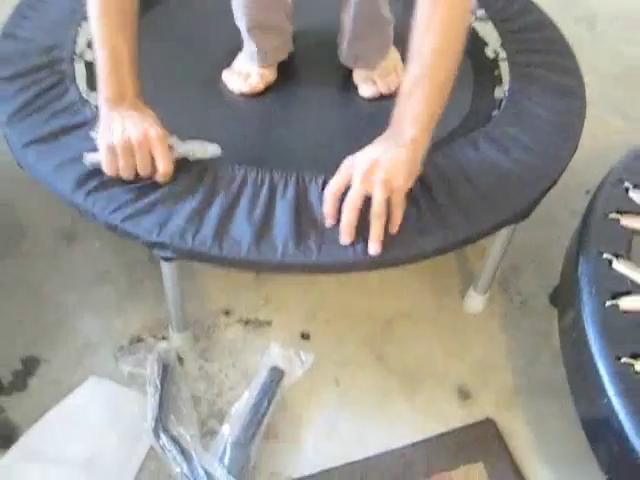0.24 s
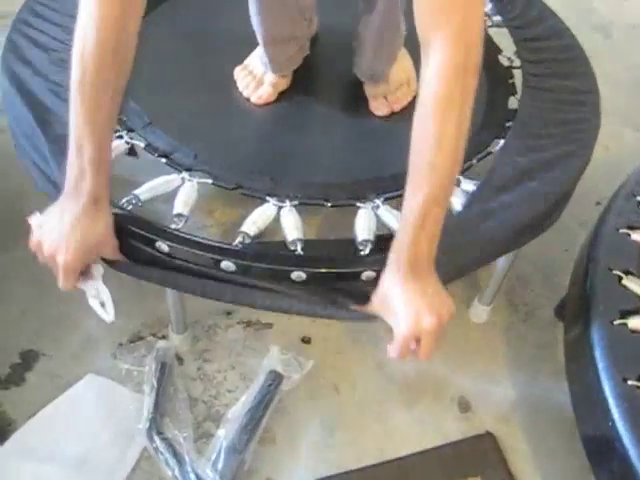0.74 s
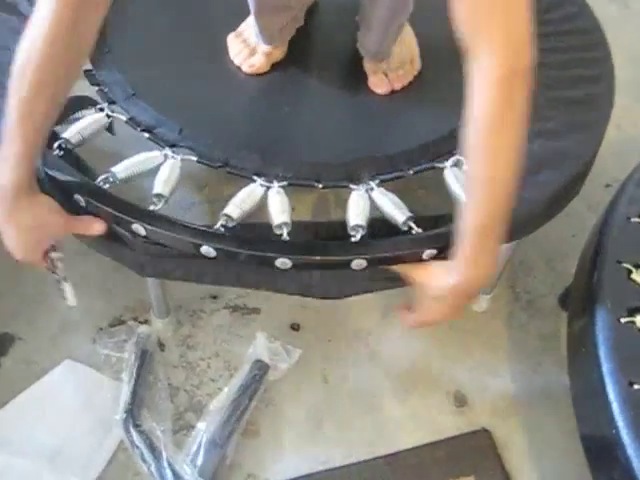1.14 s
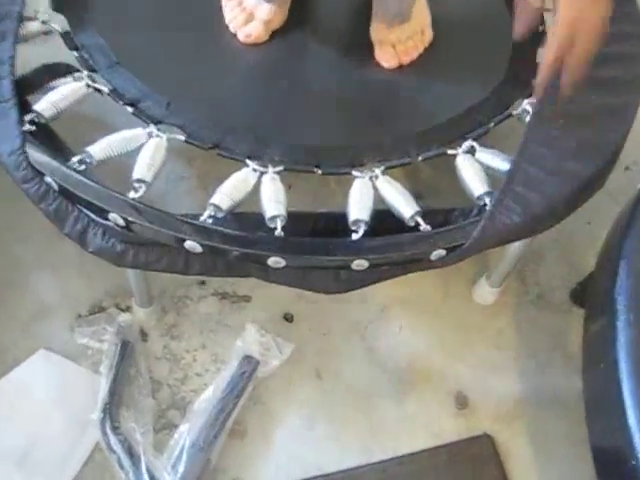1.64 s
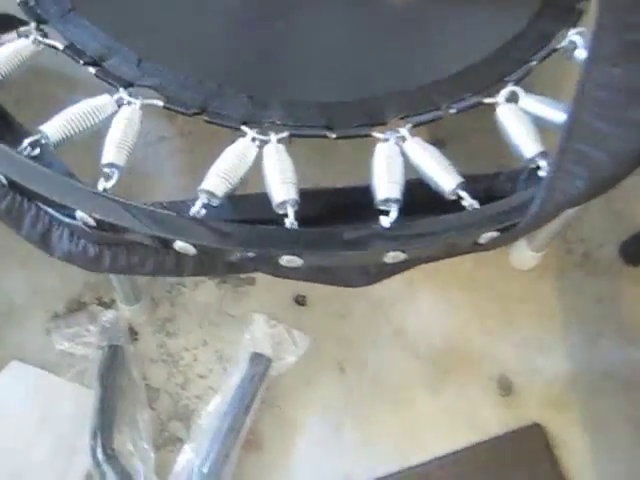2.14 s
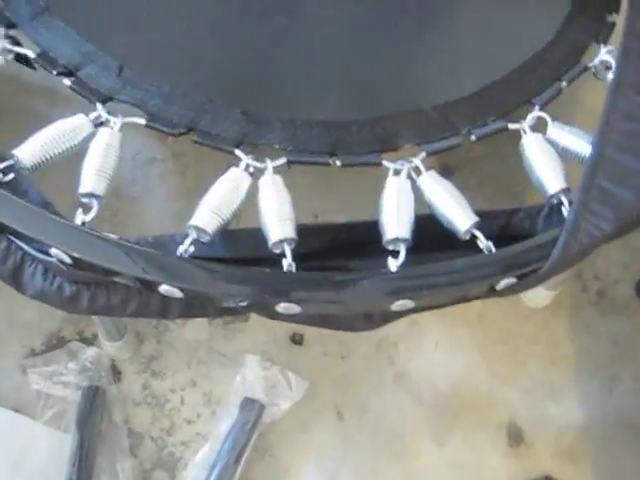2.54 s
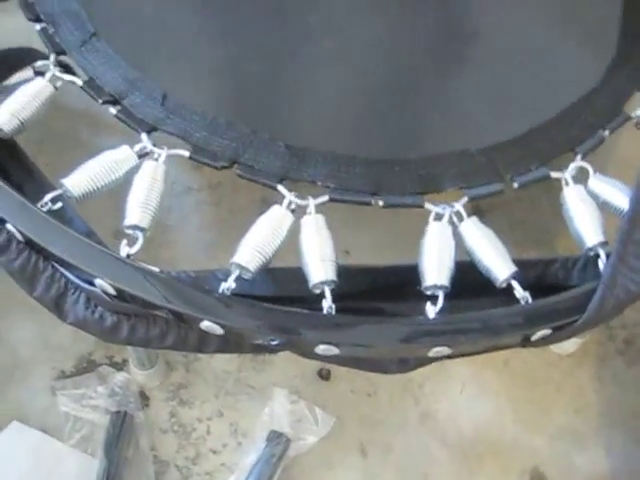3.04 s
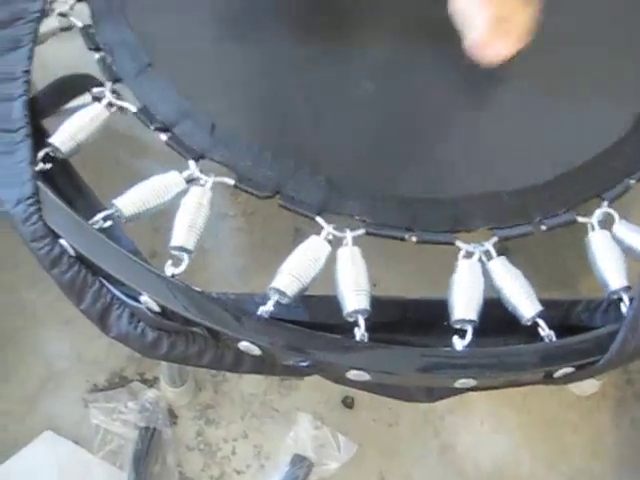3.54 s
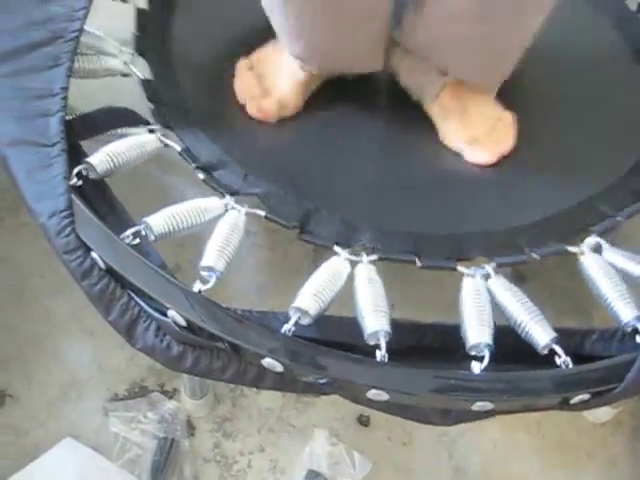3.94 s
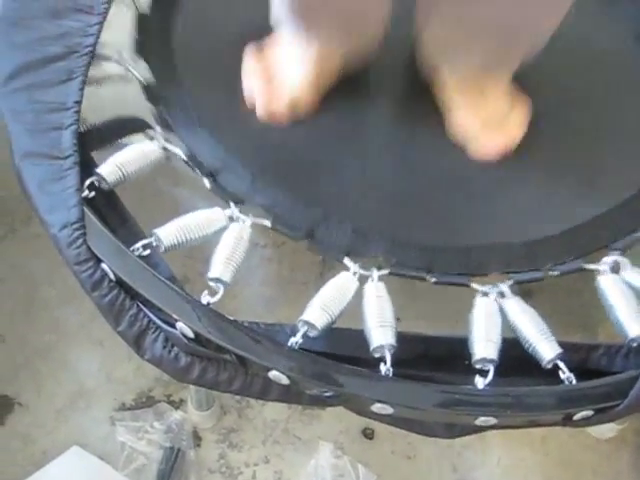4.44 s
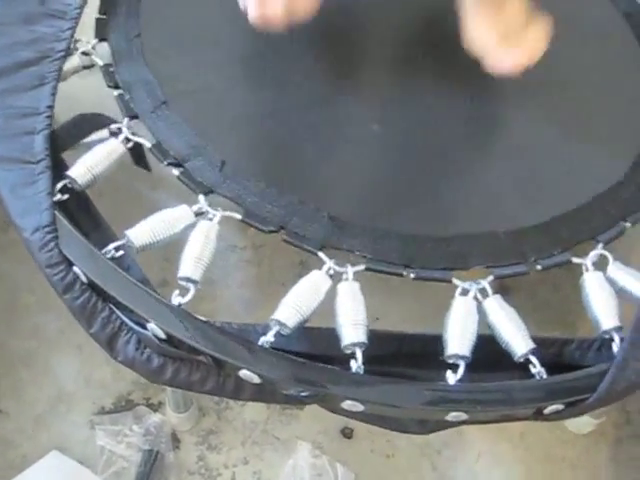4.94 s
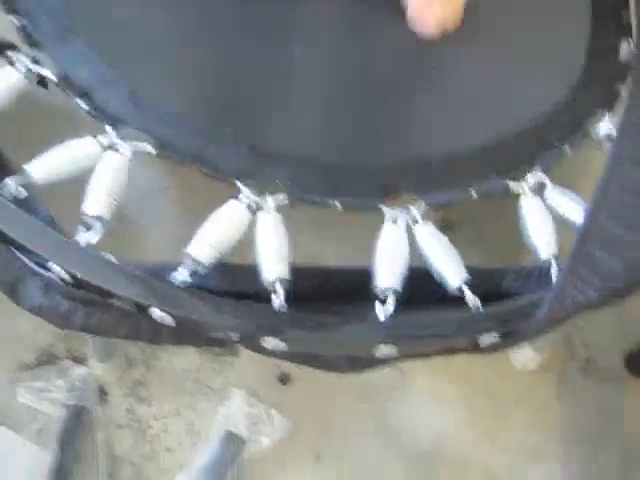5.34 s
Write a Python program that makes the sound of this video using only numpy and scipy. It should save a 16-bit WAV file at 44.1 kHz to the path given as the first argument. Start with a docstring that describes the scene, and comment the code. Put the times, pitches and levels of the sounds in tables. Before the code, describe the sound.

A fabric cover rustles and knocks off a mini-trampoline's rim, then steel springs creak and clink over soft barefoot bounces in a garage.

```python
"""A mini-trampoline creaks and thuds in a garage as someone bounces on it barefoot. Each landing thumps
the mat, and the steel spring hooks grind, crack and ring as they take the load.
Before the bouncing, a padded fabric cover is pulled off the rim: the cloth rustles and snaps taut, and
its hem knocks on the rim and drags over the coils, which shimmer.
The concrete echoes it all, over a soft hiss and a faint hum."""
import sys
import numpy as np
from scipy import signal
from scipy.fft import rfft, irfft, next_fast_len
from scipy.io import wavfile

SR = 44100
rng = np.random.default_rng(int(sys.argv[2]) if len(sys.argv) > 2 else 0)


def log_audio(samples):
    """Write samples as a 16-bit WAV file to the path given in sys.argv[1]."""
    # one column per channel
    frames = np.atleast_2d(samples).T
    # limit to full scale, then quantise
    limited = np.clip(frames, -1, 1)
    pcm = np.round(limited * 32767).astype(np.int16)
    wavfile.write(sys.argv[1], SR, pcm)


N = 247204
TIME = np.arange(N) / SR

# Levels in the tables are relative: the functions add gains of their own.
# A fade is the time to fall to about a third; a ring time is the time to fall by 60 dB.

# Barefoot landings. Each row: when the toes touch and how much later the heels do, in seconds, thud in
# dB, heel press in seconds, then in dB the heel rub, the creak going down and the creak going up.
LANDINGS = [(3.199, 0.082, -23.5, 0.11, -34, -31, -26), (3.804, 0.11, -23.5, 0.17, -28, -27.5, -26),
            (4.415, 0.115, -20.5, 0.083, -28.5, -30.5, -29), (5.016, 0.115, -21.5, 0.068, -28.5, -32, -31)]
# The feet leave the mat and the slack springs rattle. Each row: time in seconds, level in dB.
LIFTOFFS = [(2.935, -25.5), (3.57, -24.5), (4.145, -25), (4.77, -30.5), (5.375, -34.5)]
# The jumper first shifts weight. In order: start and length in seconds, hook creak and mat rub in dB.
WEIGHT_SHIFT = (2.15, 0.72, -41.5, -43)
# The first push out of the mat. In order: time in seconds, thud and mat rub in dB.
FIRST_PUSH = (2.937, -32, -29.5)
# The parts of a bounce. Each holds delay, rise time and length in seconds, then fall in dB per second.
STRETCH = (0.02, 0.025, 0.125, 140)   # hooks turn as the mat sinks
RECOIL = (0.2, 0.029, 0.06, 96)   # hooks turn back as it rises
BEARING = (0.005, 0.06, 0.39, 85)   # the mat carries the weight
PUSH_RUB = (-0.012, 0.015, 0.02, 100)   # the mat rubs at the first push

# Hooks slip with a crack. Each row: start and fade in seconds, level in dB, pitch in Hz, drop away from
# that pitch in dB per octave, coil ring in dB.
HOOK_CRACKS = [(2.308, 0.005, -42, 5000, 3, -70), (2.438, 0.004, -40, 3640, 6, -68),
               (2.556, 0.003, -35, 3060, 10, -63), (2.7145, 0.0032, -27.5, 11500, 18, -73),
               (2.827, 0.0038, -28.5, 2630, 9, -70), (2.852, 0.015, -36.5, 3470, 2, -56),
               (3.2833, 0.002, -10.5, 3570, 5, -48), (3.3489, 0.0036, -13.5, 6120, 3, -38),
               (3.4513, 0.0025, -16.5, 6860, 3.5, -40), (3.4937, 0.0038, -11.5, 5500, 6, -57),
               (3.832, 0.005, -26.5, 3840, 14, -60), (3.853, 0.0033, -18.5, 4780, 14, -57),
               (3.87, 0.0052, -21.5, 5750, 14, -60), (3.918, 0.0034, -19, 6920, 1, -47),
               (3.9471, 0.0035, -16, 7300, 3.5, -55), (4.048, 0.0065, -21.5, 6050, 4, -53),
               (4.063, 0.0031, -21.5, 7030, 10, -46), (4.071, 0.0061, -17.5, 7360, 6, -63),
               (4.0922, 0.0023, -18, 7260, 20, -39.5), (4.45, 0.005, -19.5, 5600, 13, -61),
               (4.4633, 0.002, -10.5, 4800, 15, -42), (4.691, 0.002, -14.5, 6000, 3.5, -31.5),
               (4.767, 0.0036, -21.5, 6400, 4, -55), (5.08, 0.003, -29.5, 4000, 2.5, -52),
               (5.3504, 0.0026, -15.5, 6700, 3.5, -40.5)]
# Dry hooks squeak. Each row: start and length in seconds, final pitch in Hz, level in dB, and the octave
# above in dB compared with that level.
HOOK_SQUEAKS = [(2.393, 0.015, 3850, -32, -16), (2.503, 0.0092, 3850, -23.5, -13),
                (2.512, 0.044, 3345, -32, 0), (4.438, 0.014, 3010, -27, -3), (5.039, 0.0076, 3050, -25, -7),
                (5.047, 0.023, 2540, -27, -2), (5.331, 0.02, 2420, -25, -19)]
# The noise bands that make up a knock or crack. Each row: low edge and high edge in Hz.
CONTACT_BANDS = [(700, 2200), (2200, 5500), (5500, 9000), (9000, 14500)]

# Hands pull the cover. Each row: start, rise time and length in seconds, fall in dB per second, then
# rustle, crisp treble and padding rub in dB.
COVER_PULLS = [(-0.04, 0.03, 0.24, 90, -39, -45, -44), (0.235, 0.064, 0.12, 82, -27, -40, -31),
               (0.414, 0.042, 0.045, 40, -31, -45, -37), (0.624, 0.048, 0.043, 92, -29, -39, -32),
               (0.761, 0.047, 0.11, 51, -28.5, -39.5, -38.5), (0.883, 0.028, 0.024, 300, -25, -36, -38),
               (0.946, 0.2, 0.23, 353, -27.5, -34.5, -35), (1.215, 0.07, 0.072, 260, -27.5, -30.5, -33.5),
               (1.396, 0.017, 0.071, 26, -30, -36.5, -31), (1.49, 0.12, 0.14, 220, -28.5, -33, -36),
               (2.03, 0.07, 0.08, 110, -43, -54, -42)]
# The biggest folds snap taut. Each row: time in seconds, level in dB.
FOLD_SNAPS = [(0.2233, 0), (0.298, 0.5), (0.3642, 1), (0.4452, -5), (0.5066, -12), (0.541, -1), (0.665, -7),
              (2.2495, -17)]
# The hem knocks on the rim. Each row: start and fade in seconds, level in dB, pitch in Hz, drop away
# from that pitch in dB per octave, rim ring in dB.
HEM_KNOCKS = [(0.64, 0.0032, -17, 1650, 10.5, -41), (1.1339, 0.0015, -19, 3720, 6, -57),
              (1.1395, 0.0039, -19.5, 3750, 5.5, -37), (1.1883, 0.0026, -6, 1900, 6.5, -42),
              (1.401, 0.004, -22.5, 1710, 8, -32.5), (1.4068, 0.0022, -10.5, 1734, 11, -29),
              (1.445, 0.0018, -17, 1770, 9, -44), (1.533, 0.0034, -18.5, 1540, 7.5, -33.5)]
# The hem drags over the coils. Each row: start and length in seconds, fall in dB per second, level in dB.
HEM_DRAGS = [(0.625, 0.06, 300, -24), (1.215, 0.095, 130, -21), (1.412, 0.12, 100, -23),
             (1.602, 0.27, 80, -26), (2.068, 0.04, 400, -31)]
# The tones of the dragged coils. Each row: pitch before bending and width in Hz, level in dB.
COIL_BANDS = [(664, 58, -12), (985, 93, -1), (1420, 140, 1), (1680, 58, -7.5), (1830, 100, -2.5),
              (2410, 410, 0), (2790, 91, -6.5), (3890, 250, -6.5)]
# Those tones bend down as the hem slackens. In order: start and end in seconds, first and last pitch ratio.
SLACKEN = (1.4, 2.0, 1.07, 0.95)
# The frame jolts as the hem slips over it. In order: time in seconds, peak in dB, fade in seconds.
FRAME_JOLT = (1.190, -12, 0.00067)

# How each part rings. Each row: pitch and spread to either side in Hz, level in dB, ring time in seconds.
COIL_MODES = [(1116, 26, -3, 0.77), (1197, 29, -6, 0.44), (1050, 140, -4, .5), (3104, 61, -6, 0.74)]   # a whole coil
HOOK_MODES = [(7390, 33, 6, 0.17), (7650, 510, -21, .4), (8770, 270, -9, 0.51), (11700, 250, -14, .35),
              (3380, 710, -8.5, 0.18)]   # the hook ends
MAT_MODES = [(73, 11, -19, 0.31), (204.2, 3.4, 2.5, 0.64)]   # the stretched mat and frame
RIM_MODES = [(943, 6, -10, 1.0), (1010, 18, -8, 1.1), (1345, 15, -14, 1.6), (1420, 12, -8, 1.4),
             (1669, 5, -1, .6), (1705, 22, 0, .4), (1790, 14, -3, 1.15), (1910, 12, -10, .9),
             (2718, 15, -14, .9)]   # the steel rim with the springs hanging on it

# The tone colour of each noise, from bass to treble. Each row: frequency in Hz, level in dB.
CREAK_COLOUR = [(710, -52), (1200, 3), (1590, -10), (1930, 1), (2300, -1.5), (2480, -0.5), (4500, 2),
                (5780, 1.5), (7410, 0), (8000, -8), (13900, -22), (16000, -32)]
MAT_RUB_COLOUR = [(60, -29), (130, -14), (220, -5), (450, 3), (800, 4.5), (1200, 5), (2000, -2),
                  (4000, -14)]
THUD_COLOUR = [(30, -24), (75, -2.5), (140, -1), (230, -2), (450, 1.5), (800, -11.5), (2200, -11),
               (8000, -32)]
CLOTH_COLOUR = [(530, -35), (900, -6), (1030, -3), (1720, -4), (1880, 0.5), (2230, -3.5), (2730, 1),
                (5750, -2.5), (10000, -13.5), (13000, -32), (22000, -120)]
CRISP_COLOUR = [(4000, -2), (8000, -3), (11000, -3), (15500, -11.5)]
AIR_COLOUR = [(15, -45), (25, -6), (127, 0.5), (285, 6.5), (451, -0.5), (887, 0.5), (1160, -5), (1370, -9),
              (4250, -4.5), (7310, -9.5), (12200, -15), (14800, -17), (16000, -14)]

# How long the garage echoes. Each row: frequency in Hz, ring time in seconds.
GARAGE_RING = [(200, 0.62), (1400, 1), (4000, 0.41), (8000, 0.46), (15000, 0.27)]
# A low hum and a high whine. Each row: pitch in Hz, level in dB.
HUM_TONES = [(138, -61), (15149, -71)]

TOE_FADE_S, HEEL_FADE_S, HEEL_DB = 0.015, 0.02, -5   # the heel level is compared with the toes
HEEL_RISE_S, BEARING_DB = 0.042, -37.5
SHAKE_DB, SHAKE_FADE_S = -16, 0.005   # the lowest band of each knock or crack also shakes the mat
SQUEAK_SHARP, SQUEAK_SETTLE_S = 0.145, 0.00504   # a squeak starts too high by this share, then settles


def bouncing():
    """How strongly hooks creak and the mat rubs as the springs stretch, rest, recoil and go slack."""
    start, length, creak_db, rub_db = WEIGHT_SHIFT
    sway = swell(start, attack=0.42, length=length, release=42)
    creak, rub = [from_db(creak_db) * sway], [from_db(rub_db) * sway]
    for start, heel_delay, _, press, heel_db, down_db, up_db in LANDINGS:
        creak.append(from_db(down_db) * stroke(start, STRETCH))
        creak.append(from_db(up_db) * stroke(start, RECOIL))
        rub.append(from_db(BEARING_DB) * stroke(start, BEARING))
        heel_press = swell(start + heel_delay - HEEL_RISE_S, HEEL_RISE_S, press, release=200)
        rub.append(from_db(heel_db) * heel_press)
    start, _, rub_db = FIRST_PUSH
    rub.append(from_db(rub_db) * stroke(start, PUSH_RUB))
    for moment, rattle_db in LIFTOFFS:
        creak.append(from_db(rattle_db) * swell(moment - 0.04, attack=0.04, length=0.048, release=145))
    return together(creak), together(rub)


def springs(load):
    """Hooks grind under load, let go with sharp cracks and leave the coils ringing."""
    stick_slip = from_db(1.6 * drift(220))
    grind = stick_slip * coloured(friction(4000, spread_db=3, hiss=0.8), CREAK_COLOUR)
    # harder grinding is brighter and shakes more hooks
    effort = np.sqrt(load / load.max())
    bright = rms_one(band(friction(2700, spread_db=3.8, hiss=0.5), 7500, 9300))
    grind += from_db(-9.5) * effort * bright
    grind += from_db(-3) * effort * tinkle(per_s=260, width_hz=130)
    out = from_db(-2) * load * grind
    # each crack sets a coil and hook ringing, reusing one of six ready-made rings
    rings = [(ringing(COIL_MODES), ringing(HOOK_MODES)) for _ in range(6)]
    for k, (start, fade, db, hz, falloff_db, ring_db) in enumerate(HOOK_CRACKS):
        coil, hook = rings[k % len(rings)]
        band_db = contact_colour(db, hz, falloff_db)
        add(out, start, from_db(2.5) * contact(fade, hz, band_db, rise=0.00078, tone_db=0.5))
        add(out, start, from_db(ring_db + 2.5) * coil)
        # the brighter the crack, the more the hook ends ring
        add(out, start, from_db(band_db[2] - 18.5) * hook)
    return out


def tinkle(per_s, width_hz):
    """Many hooks tick at random, each with a short ring at its own pitch."""
    taps = (rng.random(N) < per_s / SR) * rng.uniform(-0.79, 1, N)
    pitches = np.geomspace(2400, 8200, 16)
    which_hook = rng.integers(0, len(pitches), N)
    rings = (resonate(taps * (which_hook == k) + 1e-18, hz, width_hz) for k, hz in enumerate(pitches))
    return rms_one(sum(rings))


def ticks(load):
    """Loaded hooks make small slips at random, each at a pitch of its own."""
    out = np.zeros(N)
    for start, db in at_random(per_s=8.9, level=load):
        hz = rng.uniform(3000, 7000)
        band_db = contact_colour(db + 2, hz, falloff_db=11)
        add(out, start, contact(fade=0.0057, hz=hz, band_db=band_db, rise=0.00085, tone_db=-2))
    return out


def squeaks():
    """A sticking hook sings briefly and unsteadily, settling in pitch."""
    out = np.zeros(N)
    waver = 0.02 * drift(700)
    flutter = from_db(4 * drift(700))
    for start, length, hz, db, octave_db in HOOK_SQUEAKS:
        t = TIME[:round(length * SR)]
        now = round(start * SR) + np.arange(len(t))
        pitch = hz * (1 + SQUEAK_SHARP * np.exp(-t / SQUEAK_SETTLE_S) + waver[now])
        phase = 2 * np.pi * np.cumsum(pitch) / SR
        shape = from_db(db) * np.sin(np.pi * t / length) ** 2 * flutter[now]
        add(out, start, shape * (np.sin(phase) + from_db(octave_db) * np.sin(2 * phase)))
    return out


def mat(rub):
    """The taut mat rubs as it stretches, and thuds and hums at each bump; the frame jolts once."""
    uneven = from_db(2.4 * drift(50))
    rubbing = coloured(friction(1500, spread_db=2.4, hiss=0.71), MAT_RUB_COLOUR)
    out = from_db(-3) * rub * uneven * rubbing
    t = TIME[:8192]
    hums = [ringing(MAT_MODES) for _ in range(5)]
    for k, (start, db, fade) in enumerate(bumps()):
        thud = burst_shape(t, 0.0025, fade) * coloured(rng.standard_normal(len(t)), THUD_COLOUR)
        add(out, start, from_db(db - 5.5) * thud)
        add(out, start, from_db(db - 21) * hums[k % len(hums)])
    start, db, fade = FRAME_JOLT
    jolt = band(burst_shape(t, 0.00074, fade), 6.1, 1200)
    add(out, start, from_db(db) * jolt / np.abs(jolt).max())
    return out


def bumps():
    """Everything that bumps the mat. Each row: start in seconds, level in dB, fade in seconds."""
    push = [(*FIRST_PUSH[:2], HEEL_FADE_S)]
    toes = [(start, db, TOE_FADE_S) for start, _, db, *_ in LANDINGS]
    heels = [(start + delay, db + HEEL_DB, HEEL_FADE_S) for start, delay, db, *_ in LANDINGS]
    shakes = [(start, contact_colour(db, hz, falloff_db)[0] + SHAKE_DB, SHAKE_FADE_S)
              for start, _, db, hz, falloff_db, _ in [*HEM_KNOCKS, *HOOK_CRACKS]]
    return push + toes + heels + shakes


def pulling():
    """How strong the rustle, crisp treble and padding rub are as hands pull the cover."""
    rustle, crisp, padding = [], [], []
    for start, attack, length, release, rustle_db, crisp_db, padding_db in COVER_PULLS:
        pull = swell(start, attack, length, release)
        rustle.append(from_db(rustle_db) * pull)
        crisp.append(from_db(crisp_db) * pull)
        padding.append(from_db(padding_db) * pull)
    return together(rustle), together(crisp), together(padding)


def cover(rustle, crisp):
    """Cloth rustles in uneven tugs, while big folds and small random creases snap taut."""
    tugs = from_db(1.2 * drift(140))
    out = from_db(1) * rustle * tugs * coloured(friction(5000, spread_db=2.2, hiss=1), CLOTH_COLOUR)
    out += crisp * tugs * coloured(friction(6000, spread_db=3, hiss=0.84), CRISP_COLOUR)
    creases = at_random(per_s=8, level=from_db(11.5) * rustle)
    for start, db in [*FOLD_SNAPS, *creases]:
        hz = 2210 * 2 ** rng.uniform(-.3, .3)
        snap = band(signal.unit_impulse(512), hz * 0.47, hz * 1.87)
        snap = signal.sosfilt(signal.butter(2, hz * 1.8, fs=SR, output="sos"), snap)
        add(out, start, from_db(db - 6.5) * snap / np.abs(snap).max())
    return out


def hem():
    """The elastic hem knocks on the rim, sets it ringing and scrapes across the coils."""
    out = np.zeros(N)
    for start, fade, db, hz, falloff_db, ring_db in HEM_KNOCKS:
        band_db = contact_colour(db, hz, falloff_db)
        add(out, start, from_db(3) * contact(fade, hz, band_db, rise=0.001, tone_db=3))
        add(out, start, from_db(ring_db + 1.5) * ringing(RIM_MODES))
    scrape, coils = friction(2500, spread_db=1.6, hiss=0.8), 0
    for k, (hz, width, db) in enumerate(COIL_BANDS):
        # each tone comes and goes at random as the hem passes over the coils
        tone = rms_one(resonate(scrape, hz, width))
        coils = coils + (-1) ** k * from_db(db + 2 * drift(8.72)) * tone
    speed = np.interp(TIME, SLACKEN[:2], SLACKEN[2:])
    coils = np.interp(np.cumsum(speed), np.arange(N), coils)   # slower means lower
    drag = together(from_db(db) * swell(start, attack=0.04, length=length, release=release)
                    for start, length, release, db in HEM_DRAGS)
    return out + from_db(-2.5) * drag * rms_one(coils)


def contact(fade, hz, band_db, rise, tone_db):
    """Two surfaces chatter for a few milliseconds, around the pitch of the struck part."""
    t = np.arange(2048) / SR
    shape, chatter = burst_shape(t, rise, fade), 0
    for (low, high), gain in zip(CONTACT_BANDS, from_db(band_db)):
        chatter = chatter + gain * rms_one(band(rng.standard_normal(len(t)) * shape, low, high))
    wobble = np.cumsum(rng.standard_normal(len(t))) * .12
    tone = from_db(max(band_db) + tone_db) * np.sin(2 * np.pi * hz * t + wobble) * shape
    return chatter * np.sqrt(np.mean(shape ** 2)) + tone


def contact_colour(db, hz, falloff_db):
    """The level of each contact band in dB: weaker the farther it lies from the struck part's pitch."""
    centres = np.sqrt(np.prod(CONTACT_BANDS, axis=1))
    octaves = np.abs(np.log2(centres / hz))
    return db - falloff_db * octaves + np.array([0, 0, 0, -5.5])   # the top band is duller


def ringing(modes):
    """A struck part rings in clusters of close pitches that beat as they die, each at a chance level."""
    t, out = TIME[:36000], 0
    for hz, spread, db, ring_time in modes:
        noise = rng.standard_normal(len(t) + 8192)   # extra samples let the filter settle
        cluster = band(noise, max(hz - spread, 20), hz + spread)[-len(t):]
        chance_db = rng.normal(0, 1.8)
        out = out + from_db(db + chance_db - 60 * t / ring_time) * rms_one(cluster)
    return out


def friction(per_s, spread_db, hiss):
    """Rubbing: many tiny random slips of uneven size each second, over a smooth hiss."""
    sizes = from_db(spread_db * np.minimum(rng.exponential(1, N), 3)) * rng.choice([-1, 1], N)
    slips = sizes * (rng.random(N) < per_s / SR)
    return rms_one(slips) + hiss * rng.standard_normal(N)


def garage(x):
    """Echoes off concrete blur into a tail whose treble dies first."""
    t, tail = TIME[:32768], 0
    edges = np.geomspace(60, 19000, 12)
    for low, high in zip(edges, edges[1:]):
        ring_time = at_hz(GARAGE_RING, np.sqrt(low * high))
        tail = tail + band(rng.standard_normal(len(t)), low, high) * from_db(-60 * t / ring_time)
    tail = tail * (1 - np.exp(-(t / 0.0014) ** 2))
    return signal.fftconvolve(x, tail / np.linalg.norm(tail))[:N]


def background():
    """Quiet air hisses under a hum and a whine whose levels wander."""
    air = from_db(-45.5) * coloured(rng.standard_normal(N), AIR_COLOUR)
    hum = sum(from_db(db) * np.sqrt(2) * np.sin(2 * np.pi * hz * TIME) * from_db(3.3 * drift(2.49))
              for hz, db in HUM_TONES)
    return air + hum


def swell(start, attack, length, release):
    """Rise for `attack` seconds, hold until `length` is up, then fall by `release` dB per second."""
    t = TIME - start
    return np.clip(t / attack, 0, 1) * from_db(-release * np.clip(t - length, 0, 2))


def stroke(start, part):
    """The swell of one part of a bounce, counted from a given moment."""
    delay, attack, length, release = part
    return swell(start + delay, attack, length, release)


def burst_shape(t, rise, fade):
    """A quick rise to a peak of one, then a smooth fade."""
    shape = (1 - np.exp(-(t / rise) ** 2)) * np.exp(-t / fade)
    return shape / shape.max()


def drift(per_s):
    """A wandering curve that glides to a new random value `per_s` times a second."""
    knots = rng.standard_normal(4096)
    return np.interp(TIME * per_s, np.arange(len(knots)), knots)


def at_random(per_s, level):
    """Random moments while a level is up. Each row: time in seconds, that level in dB."""
    moments = np.flatnonzero((rng.random(N) < per_s / SR) & (level > level.max() / 10))
    return zip(moments / SR, 20 * np.log10(level[moments]))


def coloured(x, colour):
    """Give a noise a tone colour and an average level of one."""
    size = next_fast_len(len(x))
    hz = np.arange(size // 2 + 1) * SR / size
    spectrum = rfft(x, size) * from_db(at_hz(colour, hz))
    return rms_one(irfft(spectrum, size)[:len(x)])


def band(x, low, high):
    """Keep the frequencies between `low` and `high` Hz."""
    return signal.sosfilt(signal.butter(2, [low, high], "band", fs=SR, output="sos"), x)


def resonate(x, hz, width_hz):
    """Make a sound ring at one pitch; narrower rings longer."""
    return signal.lfilter(*signal.iirpeak(hz, hz / width_hz, SR), x)


def at_hz(points, hz):
    """Read between a table's rows, with octaves evenly spaced."""
    frequencies, values = np.transpose(points)
    return np.interp(np.log(np.maximum(hz, 1)), np.log(frequencies), values)


def add(out, start, sound):
    """Mix a sound in at a time in seconds."""
    first = max(round(start * SR), 0)
    out[first:first + len(sound)] += sound[:N - first]


def together(levels):
    """Combine the levels of unrelated sounds: their squares add up."""
    return np.sqrt(sum(level ** 2 for level in levels))


def from_db(db):
    """Turn decibels into a multiplier."""
    return 10 ** (np.asarray(db) / 20)


def rms_one(x):
    """Scale to an average (root mean square) level of one."""
    return x / np.sqrt(np.mean(x ** 2) + 1e-20)


def scene():
    """The trampoline's cover, mat and springs echo in the garage, over its quiet background."""
    load, rub = bouncing()
    rustle, crisp, padding = pulling()
    soft = cover(rustle, crisp) + hem() + mat(together([padding, rub]))
    steel = springs(load) + ticks(load) + squeaks()
    echoes = garage(from_db(-12) * soft + from_db(-11) * steel)
    return (soft + steel + echoes + background())[None]


def record(dry):
    """The microphone softens the highest treble, rounds the loudest peaks and cuts off at 16000 Hz."""
    ceiling = .72
    heard = signal.sosfilt(signal.butter(6, 15500, fs=SR, output="sos"), dry)
    rounded = heard / (1 + (heard / ceiling) ** 4) ** (1 / 4)
    return signal.sosfilt(signal.ellip(12, .1, 90, 16000, fs=SR, output="sos"), rounded)


dry = scene()
out = record(dry)
log_audio(out)
```